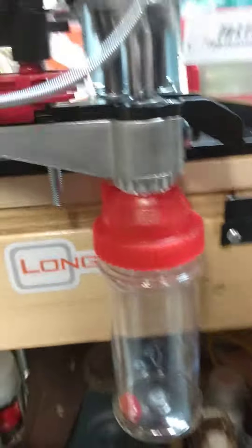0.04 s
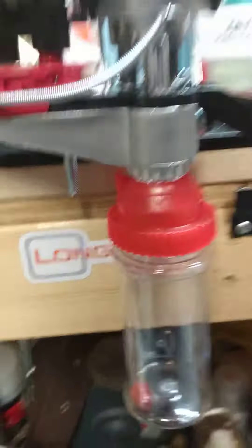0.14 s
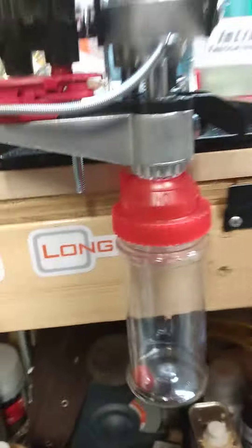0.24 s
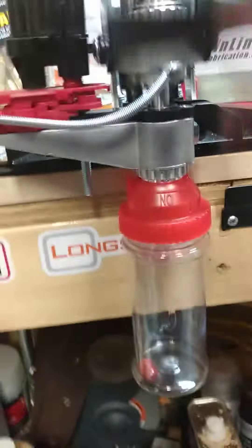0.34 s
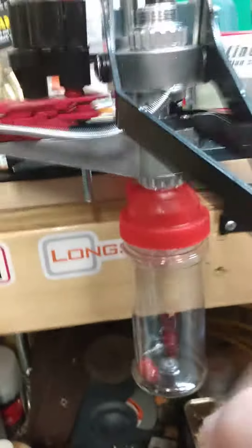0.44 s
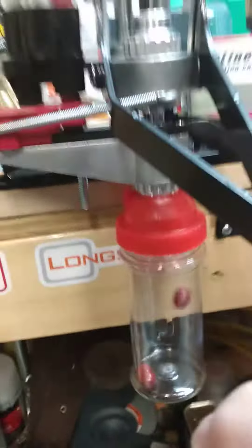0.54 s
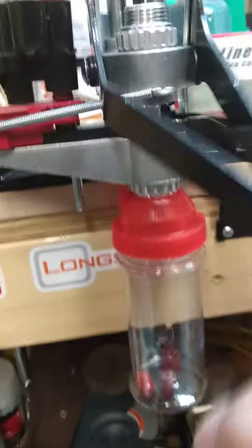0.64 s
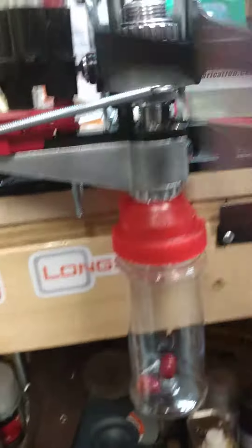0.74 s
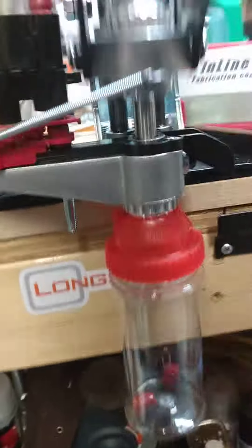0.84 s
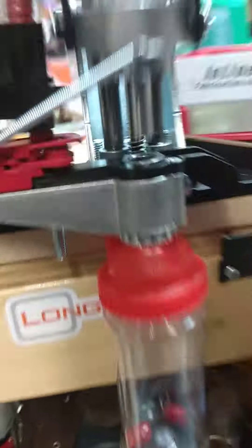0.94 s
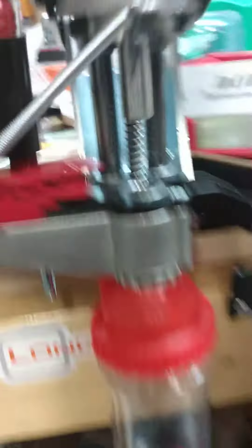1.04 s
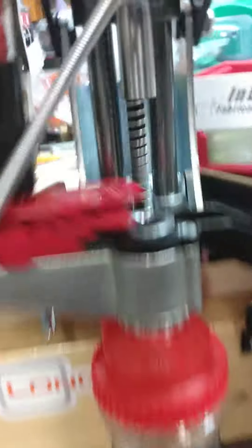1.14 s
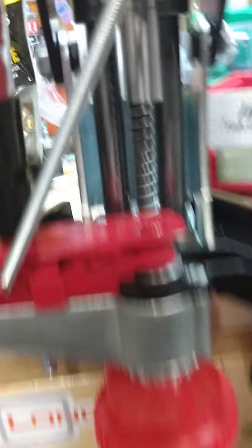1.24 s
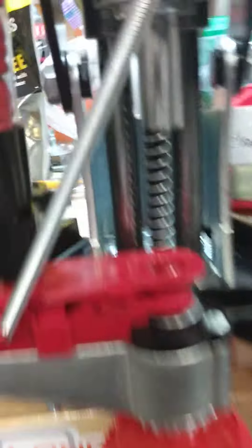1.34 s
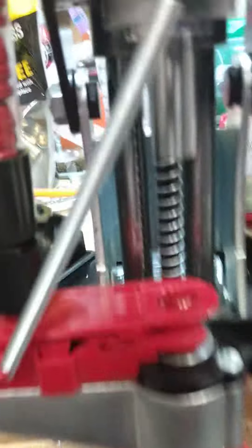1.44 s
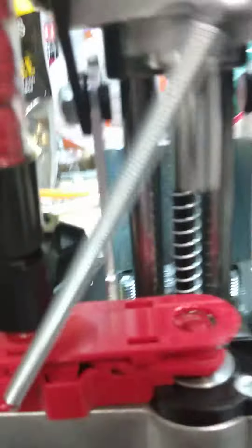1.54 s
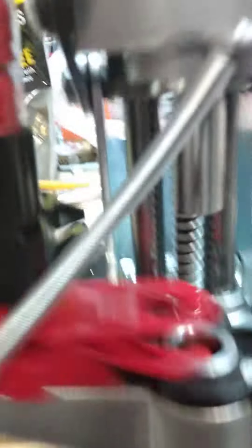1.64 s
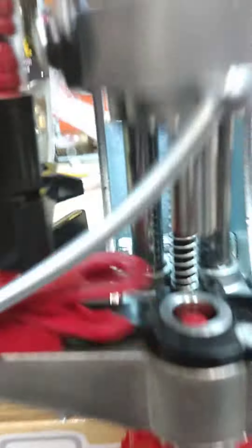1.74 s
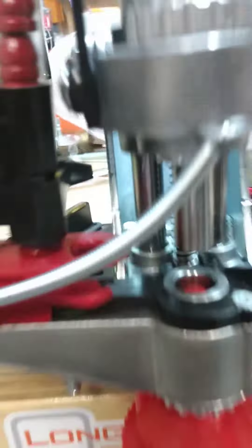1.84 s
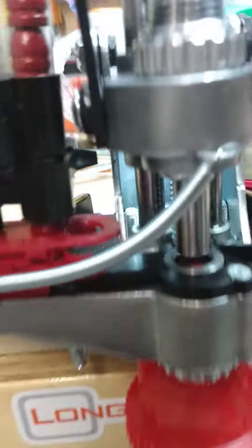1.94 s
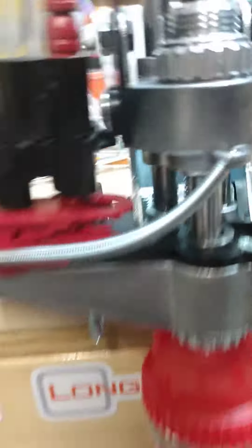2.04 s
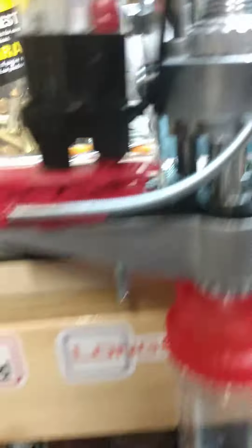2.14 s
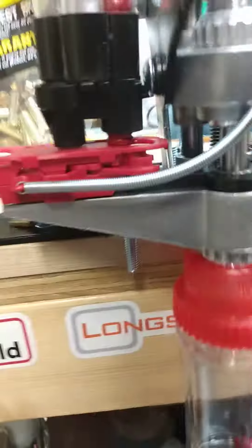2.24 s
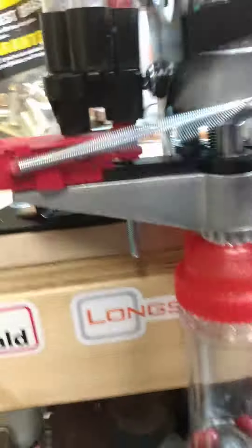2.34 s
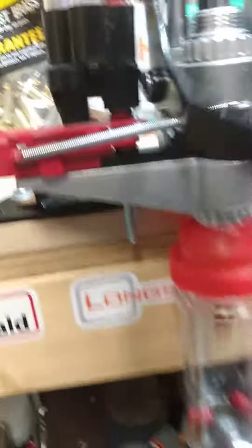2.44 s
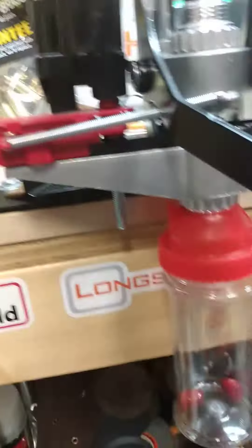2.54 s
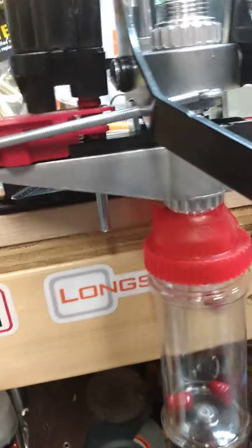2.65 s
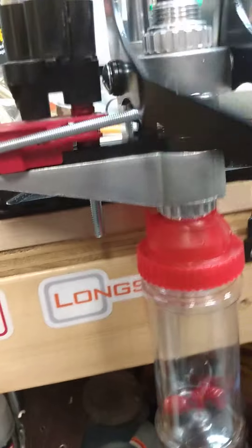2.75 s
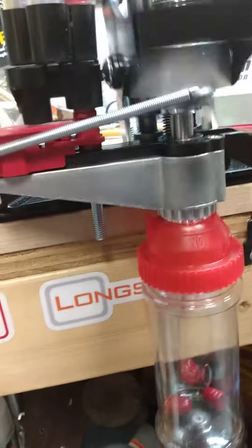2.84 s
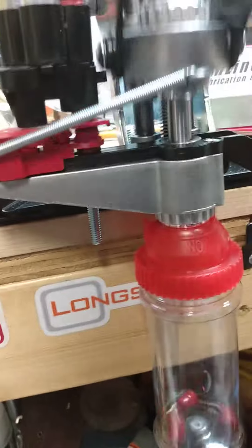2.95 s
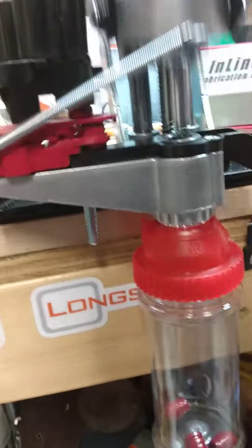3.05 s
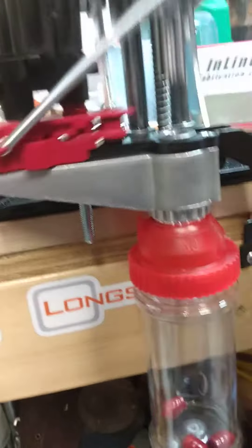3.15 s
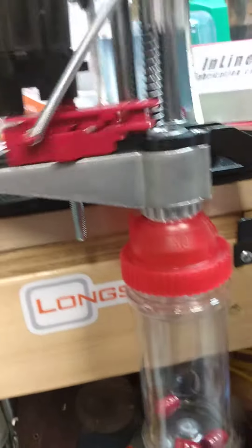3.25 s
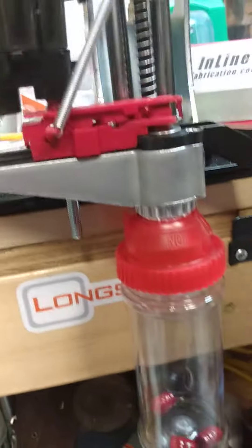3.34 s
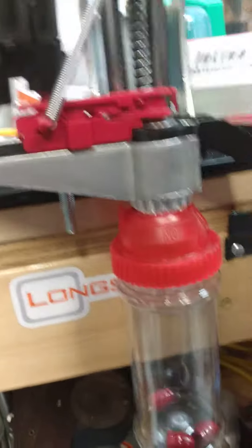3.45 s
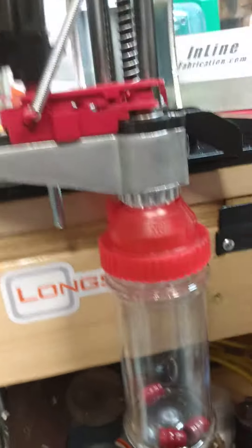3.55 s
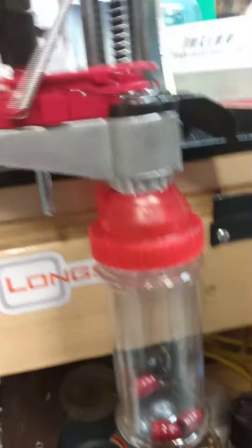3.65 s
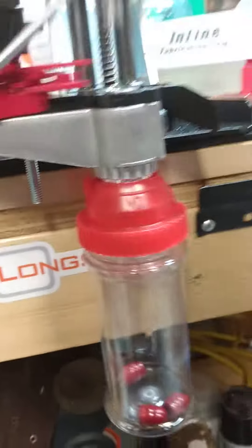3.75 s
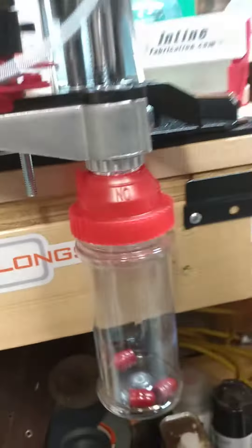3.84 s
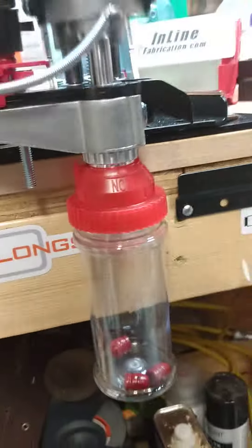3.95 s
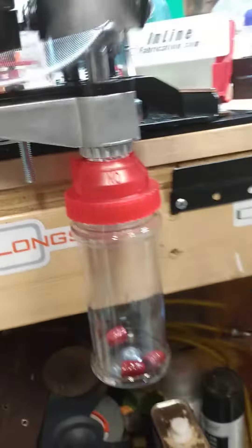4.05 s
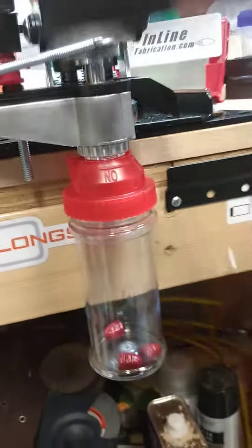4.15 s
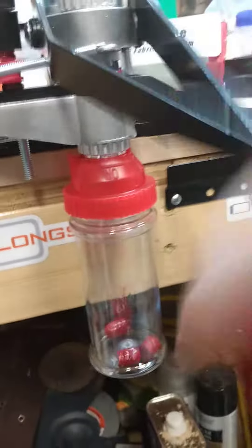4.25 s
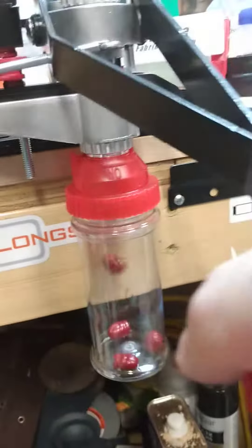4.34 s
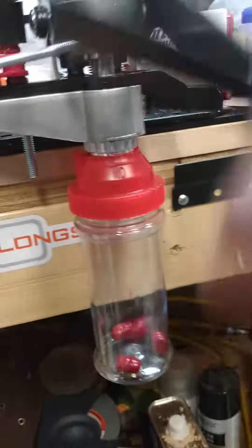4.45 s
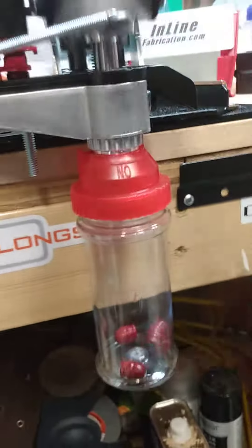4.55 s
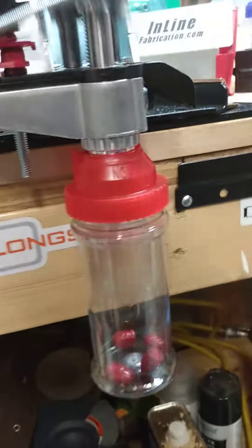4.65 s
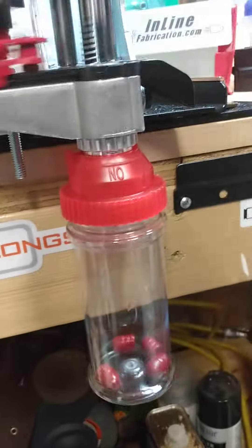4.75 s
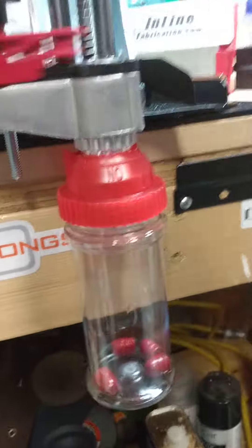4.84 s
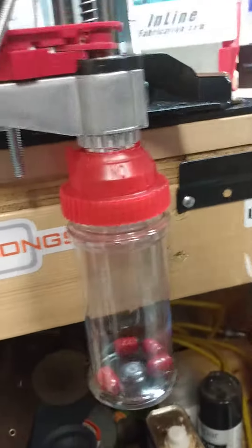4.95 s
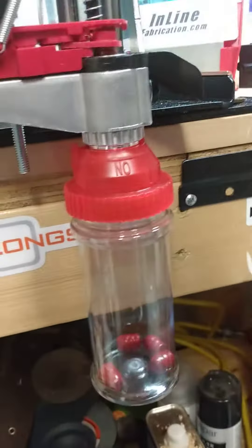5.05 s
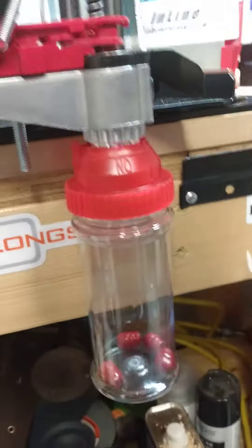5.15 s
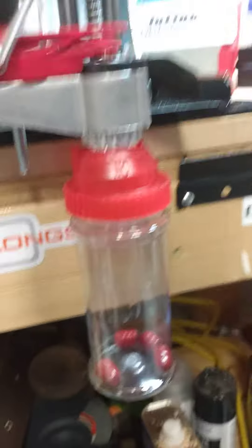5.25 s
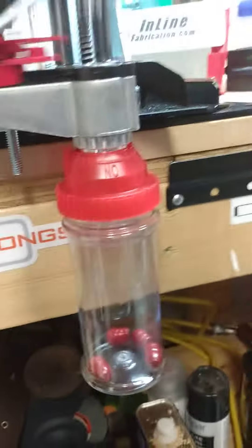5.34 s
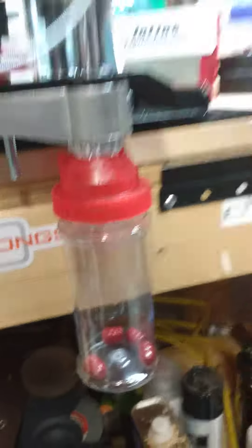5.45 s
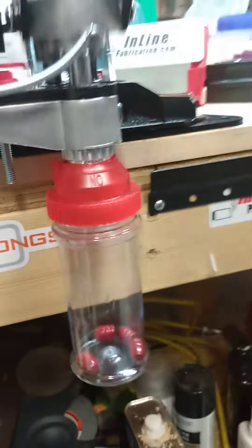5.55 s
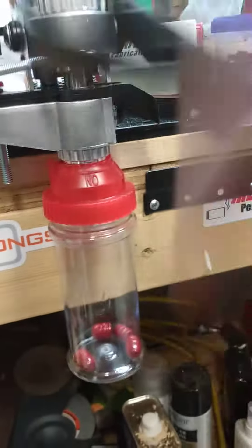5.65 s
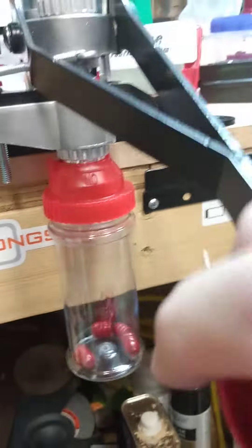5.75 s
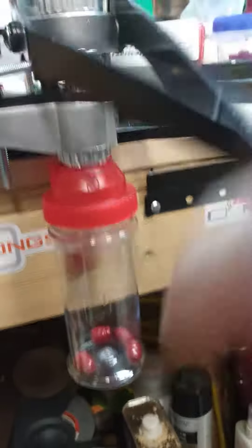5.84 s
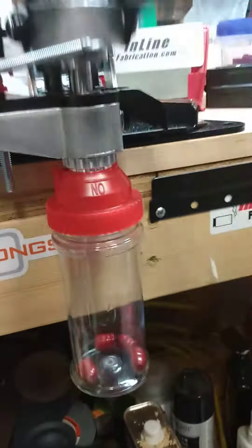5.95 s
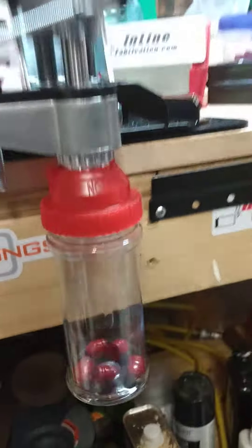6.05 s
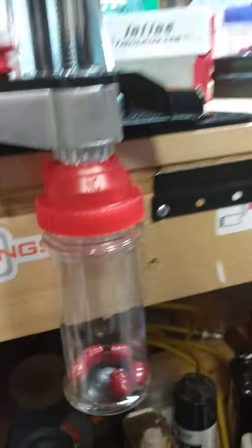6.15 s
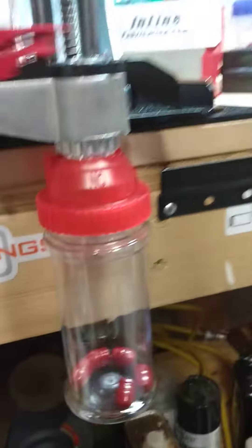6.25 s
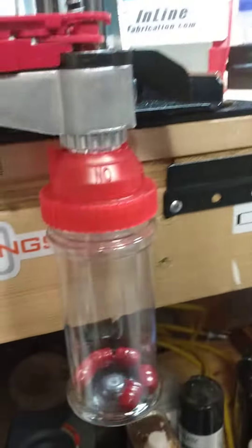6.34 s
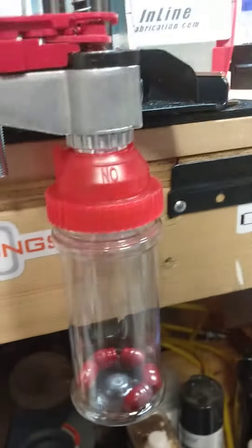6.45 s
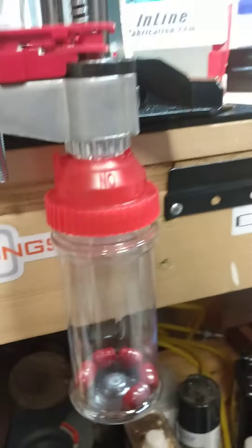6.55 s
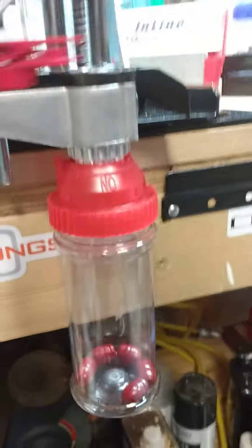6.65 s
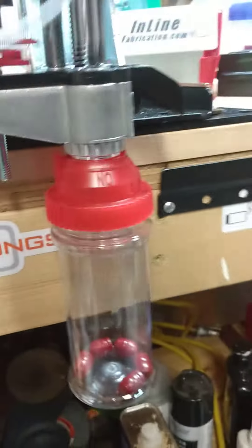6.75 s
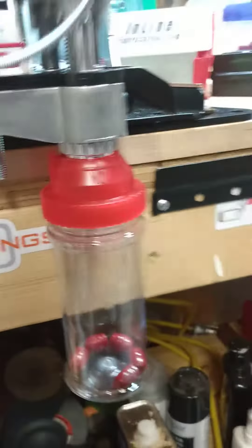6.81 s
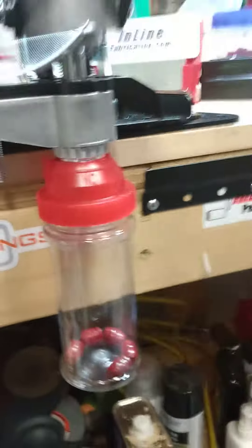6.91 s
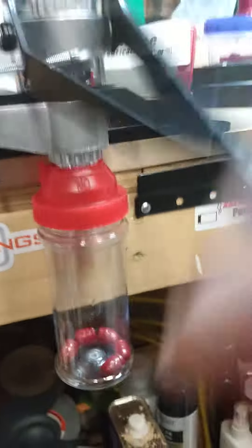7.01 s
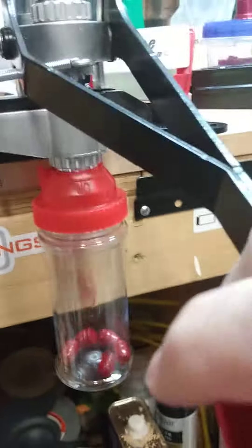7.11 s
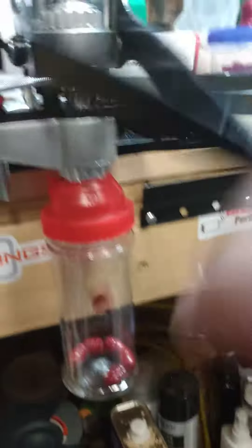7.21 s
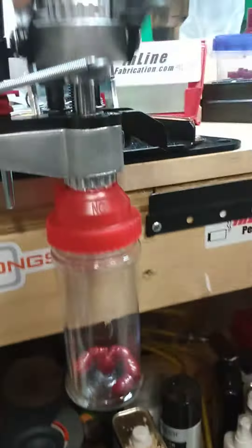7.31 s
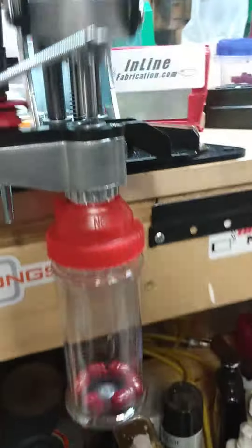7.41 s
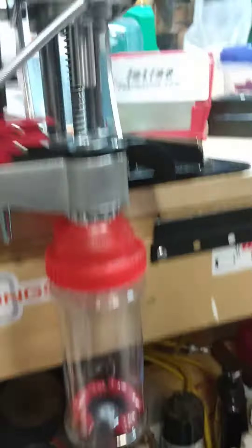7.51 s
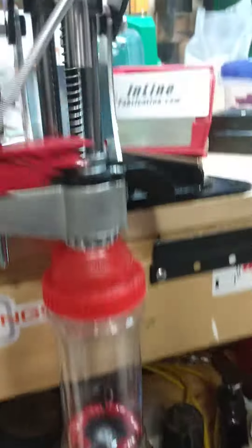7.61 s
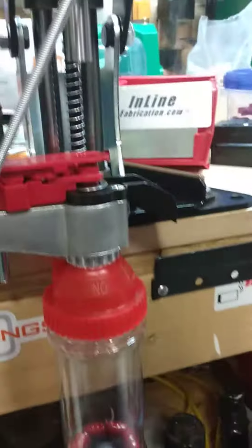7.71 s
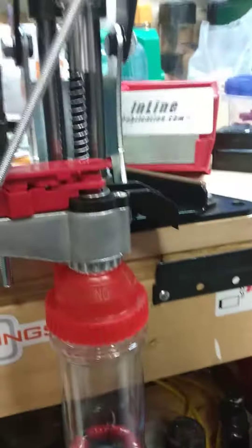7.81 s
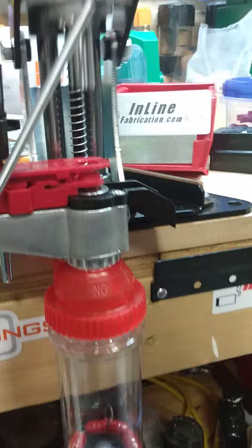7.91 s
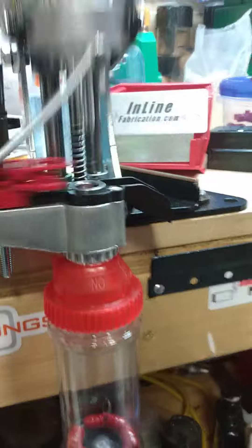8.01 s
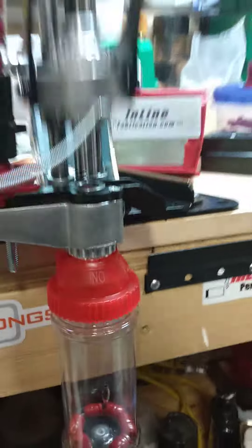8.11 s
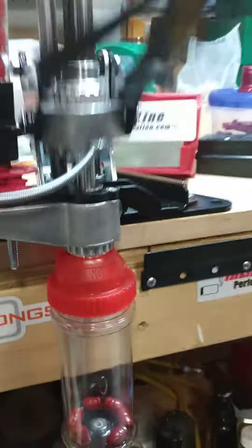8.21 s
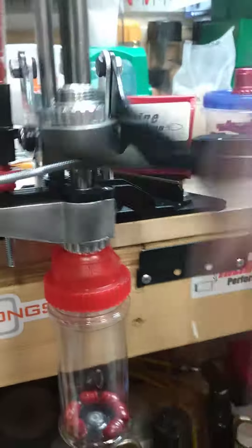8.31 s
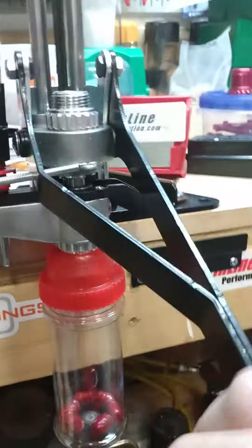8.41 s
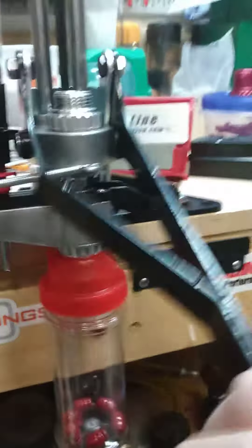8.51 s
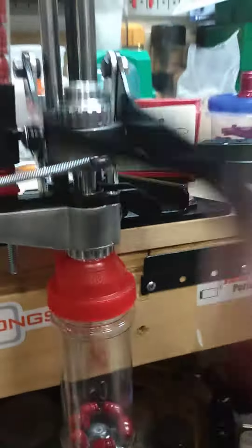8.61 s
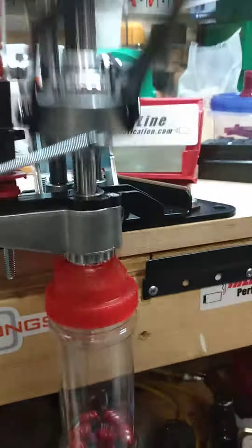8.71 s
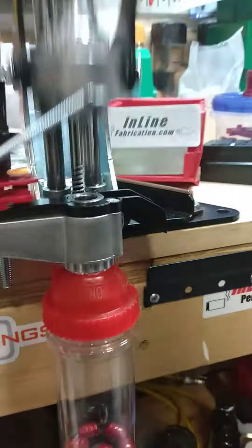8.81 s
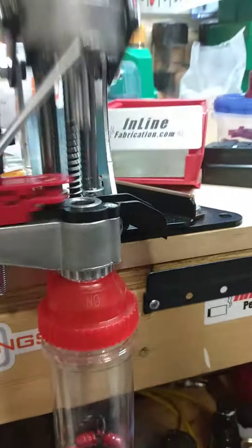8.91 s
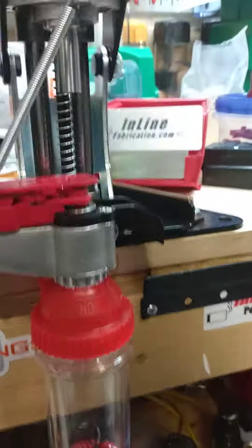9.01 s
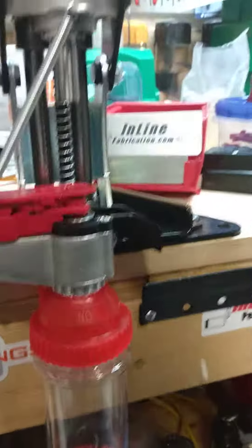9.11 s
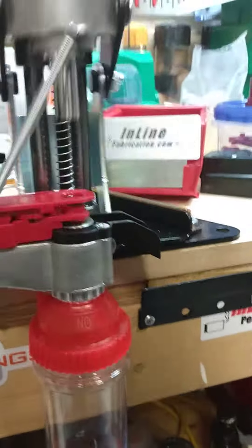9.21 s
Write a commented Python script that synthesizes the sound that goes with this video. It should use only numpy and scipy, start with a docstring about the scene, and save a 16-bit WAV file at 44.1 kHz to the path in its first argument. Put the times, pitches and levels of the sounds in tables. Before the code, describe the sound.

A hand press on a wooden bench, heard very close in a small, fairly dry workshop with faint room noise and low hum. After a few tiny clicks, the first stroke lands at about 0.6 s: a hard steel knock, a slug's snap and hollow jar thump, then return knocks until 1.0 s with spring rattle and a faint high metallic singing. The plastic feeder thuds softly at 1.4 s, and scrapes and snaps back at 1.7 s. Further strokes come around 2.5, 4.3, 5.8, 7.1 and 8.5 s, each with building rattle, a brief hiss, pop and clank, most led by quick ticks. Clattering return knocks follow each within about half a second. Dull slider clacks fall near 3.5, 5.1, 6.5, 7.8 and 9.2 s, the last two firmer. The spring sings again near 8.9 s. Treble is limited, and the loudest knocks are slightly rounded.

```python
"""A hand press on a wooden bench is cycled six times, close by, in a small workshop.
Steel knocks are noise cracks over damped modes of frame and bench; its linkage ticks in short bursts.
Slugs snap through the die and thump in a plastic jar; a plastic feed slider thuds against its stop.
Coil springs and feed tube rattle on as random contacts ringing resonances, loose slugs tap the frame,
rubbed metal hisses or sings as narrow-band noise, and faint room noise with a low hum lies beneath."""
import sys
import numpy as np
from scipy import signal
from scipy.fft import rfft, irfft
from scipy.io import wavfile
from scipy.ndimage import map_coordinates

SR = 44100
rng = np.random.default_rng(int(sys.argv[2]) if len(sys.argv) > 2 else 0)


def unload_wav(signal):
    """Save mono or channel-first audio to the path in sys.argv[1] as 16-bit WAV at rate SR, clipped to [-1, 1]."""
    wavfile.write(
        sys.argv[1],
        SR,
        np.round(np.clip(np.atleast_2d(signal).T, -1, 1) * 32767).astype(np.int16),
    )


N = 408807  # length in samples
AGE = np.arange(SR // 2) / SR  # time since a blow (s)


def amp(db):
    """Level definition: decibels become an amplitude ratio."""
    return 10 ** (np.asarray(db) / 20)


def unit(x):
    """Root-mean-square normalisation: the whole signal gets rms 1."""
    return x / np.sqrt(np.mean(x ** 2) + 1e-20)


def head(x, size=441):
    """Onset normalisation: the first `size` samples of a blow get rms 1."""
    return x / np.sqrt(np.mean(x[:size] ** 2) + 1e-20)


def along(points, hz):
    """Logarithmic frequency interpolation between (Hz, value) points."""
    point_hz, values = np.transpose(points)
    return np.interp(np.log(hz + 1), np.log(point_hz + 1), values)


def add(track, s, sound):
    """Superposition: a sound is summed into the track from time s."""
    part = track[max(round(s * SR), 0):][:len(sound)]
    part += sound[:len(part)]


def through(x, response):
    """Linear filtering: convolution with an impulse response, keeping the length."""
    return signal.fftconvolve(x, response)[:len(x)]


def colour(points, size=2048):
    """Minimum phase: folding the cepstrum makes a spectrum a causal response of energy 1."""
    log_spectrum = np.log(amp(along(points, np.fft.rfftfreq(size, 1 / SR))))
    cepstrum = np.fft.irfft(log_spectrum)
    cepstrum[1:size // 2] *= 2
    cepstrum[size // 2 + 1:] = 0
    response = irfft(np.exp(rfft(cepstrum)))
    return response / np.linalg.norm(response)


def fade(t60):
    """Exponential decay: the level falls 60 dB in t60 seconds."""
    return np.exp(-np.log(1000) * AGE / np.maximum(t60, 1e-3))


def ring(modes, detune, soft_db=0):
    """Modal superposition: damped sines whose level, pitch and sign vary from blow to blow."""
    hz, db, t60 = np.transpose(modes)[:, :, None]
    size, shift, side = rng.standard_normal((3, len(modes), 1))
    softening_db = soft_db * np.maximum(np.log2(hz / 1500), 0)  # soft_db per octave above 1500 Hz
    gain = amp(db + 3 * size - softening_db)
    phase = 2 * np.pi * hz * (1 + detune * shift) * AGE
    return np.sum(np.sign(side) * gain * fade(t60) * np.sin(phase), axis=0)


def ping(hz, t60):
    """Single-mode resonance: one small part rings at its own pitch."""
    return head(np.sin(2 * np.pi * hz * AGE) * fade(t60))


def crack(body, t60):
    """Impact noise: a decaying burst of micro-contacts is filtered by a body's response."""
    burst = rng.standard_normal(len(AGE)) * fade(t60)
    return head(through(burst, body))


# decay time of the workshop's reverberation: (frequency [Hz], t60 [s])
WORKSHOP_DECAY = [(100, .35), (500, 0.28), (2000, 0.12), (8000, 0.12)]


def room(x, wet_db, build_s=0.0018):
    """Diffuse reverberation: a noise tail builds up quickly and dies faster in the treble."""
    hz, t, z = signal.stft(rng.standard_normal(len(AGE)), SR, nperseg=256)
    decay = np.exp(-np.log(1000) * t / along(WORKSHOP_DECAY, hz)[:, None])
    tail = signal.istft(z * decay, SR, nperseg=256)[1][:len(AGE)]
    tail *= 1 - np.exp(-(AGE / build_s) ** 2)
    return x + amp(wet_db) * through(x, tail / np.linalg.norm(tail))


# hard knocks of ram and lever: (time [s], level [dB], treble re level [dB])
KNOCKS = [(0.5846, -11, -17.5), (0.7924, -11, -26), (0.8927, -17.5, -26), (0.9439, -21, -24.5),
          (1.0098, -25.5, -22), (2.6231, -11.5, -18), (2.8808, -13.5, -27.5), (2.956, -26, -22),
          (3.0259, -23.5, -18), (3.0561, -18.5, -31), (3.1163, -25, -21), (3.1571, -20, -20.5),
          (4.365, -10, -14), (4.567, -14.5, -21.5), (4.6416, -21.5, -44), (4.65, -19, -19.5),
          (4.7276, -22, -15.5), (4.7712, -25, -18.5), (5.8655, -13, -19), (6.0927, -27, -14),
          (6.1391, -32, -30), (6.1731, -18, -27), (6.2043, -27, -15), (7.2028, -11, -17.5),
          (7.4245, -17, -21.5), (7.4703, -23, -26), (7.5113, -22, -23), (7.569, -33, -15),
          (8.559, -13, -13), (8.842, -24, -14)]
# modes of the press frame, varied at each blow: (frequency [Hz], relative level [dB], t60 [s])
FRAME_MODES = [(793, -7.5, 0.071), (919.5, -5.5, 0.087), (993, -9, .07), (1093, -3.5, 0.035),
               (1481, -4, 0.035), (1535, 2, 0.015), (1621, -1.5, 0.056), (1813, 2, 0.028),
               (2400, -15.5, 0.15), (2870, -6, 0.044), (3096, -11, 0.06), (3513, -6.5, 0.019)]
# modes of the wooden bench, varied at each blow: (frequency [Hz], relative level [dB], t60 [s])
BENCH_MODES = [(68, -8.5, 0.28), (99.3, -17, 0.57), (106.4, 1, 0.3), (206, -1.5, 0.1), (247, 3.5, 0.089),
               (317, -14.5, 0.22)]
# spectrum of a knock's crack: (frequency [Hz], relative level [dB])
KNOCK_SPECTRUM = [(40, -19), (100, -13), (330, -6.5), (600, -10), (930, 8.5), (1250, -14), (1700, 6),
                  (2150, -4.5), (3200, -19), (3700, -11), (4400, -45)]
# spectrum of the treble shared by all contacts: (frequency [Hz], relative level [dB])
TREBLE_SPECTRUM = [(3000, -47.5), (4000, 21), (5000, 22.5), (5600, 17), (7000, 19.5), (7700, 12.5),
                   (8300, -49)]


def knocks():
    """Impact excitation: steel meets steel, the frame rings briefly and the bench thuds under it."""
    out, body, treble = np.zeros(N), colour(KNOCK_SPECTRUM), colour(TREBLE_SPECTRUM)
    for s, db, treble_db in KNOCKS:
        # duller blows excite the upper modes less
        frame = head(ring(FRAME_MODES, detune=0.0096, soft_db=-.7 * (treble_db + 24.0)))
        clank = head(frame + amp(-4.0) * crack(body, t60=0.035))
        thud = amp(-32.5) * head(ring(BENCH_MODES, detune=0.0074))
        blow = clank + thud + amp(treble_db) * crack(treble, t60=0.029)
        add(out, s, amp(db) * room(blow, wet_db=-9.0))
    return out


# single light contacts of linkage and feeder: (time [s], level [dB], treble re level [dB])
CLICKS = [(0.2245, -38.5, -11), (0.2874, -37.5, -17.5), (0.3794, -44, -12), (0.4234, -44, -9),
          (0.5664, -30.5, -6), (0.7816, -29.5, -17.5), (1.7137, -40, -28), (2.1533, -39, -15.5),
          (2.3413, -41, -18), (2.4129, -39, -17), (2.484, -36.5, -9.5), (2.6035, -24, -9),
          (2.835, -35, -20), (3.3098, -35, -18.5), (3.7796, -44.5, -21.5), (5.2908, -46, -25),
          (5.348, -57, -27), (6.078, -31, -13), (8.7953, -28, -12.5)]
# even runs of linkage ticks on a brisk pull: (start [s], gap [s], level [dB])
RUNS = [(4.0628, .0485, -37.5), (5.6107, 0.034, -37), (6.94, .035, -37), (8.3033, .033, -36.5)]
RUN_S, RUN_TREBLE_DB = .15, -9.5  # length of a run; its treble re its level
# the slider ticks this long before its stop, this much softer; the tick's treble re its level
TOUCH_S, TOUCH_DB, TOUCH_TREBLE_DB = .035, -17, -10
# spectrum of a light contact: (frequency [Hz], relative level [dB])
CLICK_SPECTRUM = [(50, -35.5), (150, -11.5), (370, -7), (750, -19), (1200, -7.5), (1550, -8), (1820, -4),
                  (2300, -14), (3100, -12), (3700, -15), (4400, -36.5)]


def clicks():
    """Taking up play: pins and feeder meet in small dry clicks, each with a pitch of its own."""
    out, body, treble = np.zeros(N), colour(CLICK_SPECTRUM), colour(TREBLE_SPECTRUM)
    runs = [(s + later, db, RUN_TREBLE_DB)
            for s, gap_s, db in RUNS
            for later in np.arange(0, RUN_S, gap_s)]
    touches = [(s - TOUCH_S, db + TOUCH_DB, TOUCH_TREBLE_DB) for s, db, _, _ in SLIDER_STOPS]
    for s, db, treble_db in CLICKS + touches + runs:
        pitch_hz = 1500 * np.exp(.18 * rng.normal())
        tick = head(crack(body, t60=.018) + amp(-3) * ping(pitch_hz, t60=.025))
        tick = tick + amp(treble_db) * crack(treble, t60=0.012)
        add(out, s, amp(db) * room(tick, wet_db=-1.5))
    return out


# the feed slider scraping back and letting go of its slug: (time [s], level of the snap [dB])
RELEASES = [(1.743, -33.5), (3.8082, -37.5), (5.4007, -35), (6.7441, -34), (8.0857, -36)]


def releases(lead_s=0.085):
    """Stick-slip friction: jaws scrape along the slug in growing jerks, then snap shut."""
    out, body, treble = np.zeros(N), colour(CLICK_SPECTRUM), colour(TREBLE_SPECTRUM)
    for s, db in RELEASES:
        for before in lead_s * rng.random(size=12) ** 2:  # jerks crowd towards the snap
            slip = crack(body, t60=0.035) + amp(-9.0) * crack(treble, t60=0.038)
            add(out, s - before, amp(-51 - 12 * before / lead_s) * slip)
        pitch_hz = 1700 * np.exp(.08 * rng.normal())
        snap = head(crack(body, t60=.028) + amp(-5) * ping(pitch_hz, t60=.025))
        snap = snap + amp(-21.0) * crack(treble, t60=0.13)
        add(out, s, amp(db) * room(snap, wet_db=-4.5))
    return out


# slugs popping through the die into the jar:
# (time [s], snap level [dB], treble re snap [dB], jar thump level [dB], bench thud level [dB])
DROPS = [(0.6578, -19.5, -8.5, -27, -35), (2.5229, -18, -6.5, -34, -38.5), (4.2655, -19, -6, -33.5, -41),
         (5.7922, -23.5, -1.5, -33.5, -38.5), (5.8184, -17, -11.5, -44, -35), (7.1213, -22, -4.5, -35, -38),
         (7.1557, -18.5, -8, -34, -34), (8.452, -22, -3.5, -38, -41.5), (8.507, -16.5, -7, -27.5, -34.5)]
# modes of the plastic jar, varied at each drop: (frequency [Hz], relative level [dB], t60 [s])
JAR_MODES = [(212, -8, 0.034), (325, 2, 0.16), (456, -7.5, 0.18), (560, -5.5, 0.037), (740, -4, 0.064)]


def drops():
    """Sudden release, then resonance: a slug snaps free, and hollow jar and bench swell into a thump."""
    out, body, treble = np.zeros(N), colour(RATTLE_SPECTRUM), colour(TREBLE_SPECTRUM)
    for s, db, treble_db, thump_db, thud_db in DROPS:
        snap = head(crack(body, t60=0.028) * (1 - np.exp(-AGE / 0.00071)))
        snap = snap + amp(treble_db) * crack(treble, t60=0.012)
        thump = head(ring(JAR_MODES, detune=.035) * (1 - np.exp(-AGE / 0.039)), size=1544)
        thud = head(ring(BENCH_MODES, detune=0.037) * (1 - np.exp(-AGE / 0.029)), size=1544)
        wet_snap = room(amp(db) * snap, wet_db=-5.0)
        wet_thump = amp(thump_db) * room(thump, wet_db=-10)
        add(out, s, wet_snap + wet_thump + amp(thud_db) * thud)
    return out


# the feed slider reaching its stop:
# (time [s], level of the main clack [dB], treble re level [dB], bench thud level [dB])
SLIDER_STOPS = [(1.4045, -36.5, -16, -40.5), (3.4909, -38.5, -14, -39.5), (5.1415, -46, -26, -46.5),
                (6.5062, -36, -23, -41), (7.812, -30, -16, -33.5), (9.1629, -29.5, -25, -33)]


def slider():
    """Damped impact: the plastic slider stops with a dull clack that shakes the bench."""
    out, body, treble = np.zeros(N), colour(CLICK_SPECTRUM), colour(TREBLE_SPECTRUM)
    for s, db, treble_db, thud_db in SLIDER_STOPS:
        clack = crack(body, t60=0.034) + amp(treble_db) * crack(treble, t60=0.087)
        thud = head(ring(BENCH_MODES, detune=0.02) * (1 - np.exp(-AGE / 0.0013)), size=2205)
        clack = clack + amp(-6.5) * crack(body, t60=0.0071)  # the first hard touch
        add(out, s, room(amp(db) * clack + amp(thud_db) * thud, wet_db=-12.5))
    return out


# shaking of springs and feed tube by the pull, the return and the slider's stop in each cycle:
# (start [s], build-up [s], hold [s], peak level [dB], treble re level [dB])
SHAKES = [(0.565, 0.078, 0.049, -37, -6), (0.789, 0.29, 0.082, -34, -22), (1.403, 0.011, 0.063, -43, -15),
          (2.464, .13, .11, -33.5, -15.5), (2.886, 0.21, .17, -30, -20), (3.496, 0.032, 0.077, -36, -16),
          (4.106, 0.29, 0.15, -31.5, -17.5), (4.664, .12, 0.16, -31.5, -16),
          (5.142, 0.016, 0.034, -47, -22), (5.635, 0.26, 0.15, -32, -16.5),
          (6.08, 0.022, 0.24, -25.5, -13.5), (6.513, 0.027, 0.045, -37, -17),
          (6.97, 0.28, 0.15, -29, -14.5), (7.429, 0.093, 0.13, -29, -15.5),
          (7.809, .025, 0.097, -30.5, -14), (8.334, 0.22, 0.11, -29, -12.5),
          (8.823, 0.019, 0.12, -30, -14.5), (9.166, .02, .1, -32, -14.5)]
BUILD_DB_PER_S, SAG_DB_PER_S, STOP_DB_PER_S = 72, 51.5, 302.5  # a shake grows, sags in its hold, stops
JOLT_DB, JOLT_DB_PER_S, JOLT_TREBLE_DB = -14.5, 199, -14  # every knock jolts the springs too
# faint quiver re a shake of the length QUIVER_SHAKE_S, and its decay; shorter shakes leave less
QUIVER_DB, QUIVER_DB_PER_S, QUIVER_SHAKE_S = -28.5, 70.5, 0.99


def shaking():
    """Power summation: shakes and jolts add up to two gains per sample, for body and for treble."""
    t, power = np.arange(N) / SR, np.zeros((2, N))
    for s, build_s, hold_s, db, treble_db in SHAKES:
        since_peak = t[:SR] - build_s
        since_stop = np.maximum(since_peak - hold_s, 0)
        growth_db = BUILD_DB_PER_S * since_peak
        sag_db = -SAG_DB_PER_S * np.minimum(since_peak, hold_s)
        swell_db = np.minimum(growth_db, sag_db)
        quiver = amp(QUIVER_DB - QUIVER_DB_PER_S * since_stop) * (build_s + hold_s) / QUIVER_SHAKE_S
        shake = amp(db + swell_db) * (amp(-STOP_DB_PER_S * since_stop) + quiver)
        add(power[0], s, shake ** 2)
        add(power[1], s, (amp(treble_db) * shake) ** 2)
    for s, db, _ in KNOCKS:
        jolt = amp(db + JOLT_DB - JOLT_DB_PER_S * AGE)
        add(power[0], s, jolt ** 2)
        add(power[1], s, (amp(JOLT_TREBLE_DB) * jolt) ** 2)
    return np.sqrt(power)


# resonances of springs and tube: (frequency [Hz], bandwidth [Hz], relative peak response [dB])
SPRING_MODES = [(170.6, 6.4, 3), (216, 19, 4), (331, 27, 7), (967, 22, 10), (1058, 15, 3), (1725, 68, 4.5),
                (2235, 4.2, -1), (3080, 50, -15)]
# broad spectrum of the rattle, also of a slug's snap: (frequency [Hz], relative level [dB])
RATTLE_SPECTRUM = [(40, -36.5), (120, -26), (170, -5.5), (400, -1.5), (600, -6), (950, -8.5), (1250, 0.5),
                   (1700, -5.5), (2100, -11), (3400, -5.5), (4400, -56.5)]


def rattle(shake, grit, rate=420, spread_db=2.0):
    """Random-impact excitation: chattering coils and stacked slugs, `rate` uneven contacts a second."""
    sizes = amp(spread_db * np.minimum(rng.exponential(size=N), 3))
    contacts = (rng.random(N) < rate / SR) * sizes
    force = np.sqrt(np.abs(through(contacts ** 2, fade(t60=0.011))))
    chatter = force * rng.standard_normal((2, N))
    # an amplitude proportional to bandwidth makes the peak response independent of it
    modes = sum(amp(gain) * width * np.exp(-np.pi * width * AGE) * np.cos(2 * np.pi * hz * AGE)
                for hz, width, gain in SPRING_MODES)
    broad = unit(through(chatter[0], colour(RATTLE_SPECTRUM)))
    resonant = unit(through(chatter[1], modes))
    fizz = unit(through(chatter[1], colour(TREBLE_SPECTRUM)))
    return room(shake * unit(broad + resonant) + grit * fizz, wet_db=-8.5)


def slug_taps(shake, rate=8, count=9, tap_db=0.5, spread_db=2.0):
    """Driven impacts: loose slugs tap the frame at a few spots, louder as the shaking is harder."""
    out = np.zeros(N)
    for _ in range(count):
        hits = rng.random(N) < rate / SR  # `rate` taps a second at each spot
        taps = hits * shake * amp(tap_db + spread_db * (2 * rng.random(N) - 1))
        out += through(taps, head(ring(FRAME_MODES, detune=0.046) * fade(t60=0.048)))
    return out


def swell(s, half_s, hz, width_hz):
    """Friction-driven resonance: noise feeds one mode under a bell-shaped envelope around time s."""
    resonance = np.exp(-np.pi * width_hz * AGE) * np.sin(2 * np.pi * hz * AGE)
    middle = AGE[-1] / 2
    envelope = np.exp(-((AGE - middle) / half_s) ** 2 / 2)
    return unit(through(rng.standard_normal(len(AGE)), resonance)) * envelope, s - middle


# sliding strokes, hissy on the ram and dull on the slider:
# (middle [s], envelope deviation [s], centre frequency [Hz], level at the middle [dB])
SCRAPES = [(1.314, 0.034, 1336, -63), (2.489, 0.013, 5450, -35.5), (4.229, 0.023, 5220, -45.5),
           (5.756, 0.016, 4700, -38.5), (7.082, 0.011, 4900, -32.5), (8.422, 0.018, 5100, -38),
           (9.091, 0.11, 1460, -54)]
# the long spring singing as it swings back:
# (middle [s], envelope deviation [s], frequency [Hz], level at the middle [dB])
SINGS = [(1.101, 0.055, 2454, -42), (8.921, 0.043, 2450, -37)]


def friction():
    """Bandwidth of friction noise: sliding metal hisses broadly, the rubbed spring sings narrowly."""
    out = np.zeros(N)
    for s, half_s, hz, db in SCRAPES:
        sound, start = swell(s, half_s, hz, width_hz=.13 * hz)
        add(out, start, amp(db) * sound)
    for s, half_s, hz, db in SINGS:
        sound, start = swell(s, half_s, hz, width_hz=6.8)
        add(out, start, amp(db) * sound)
    return out


# spectrum of the room noise: (frequency [Hz], relative level [dB])
BACKGROUND_SPECTRUM = [(15, -56), (25, -17.5), (38, -15), (63, 2.5), (135, -13.5), (348, -24.5), (581, -28),
                       (1100, -25), (3280, -31), (8500, -41), (11000, -73.5), (18700, -120)]


def background():
    """Stationary noise and a pure tone: faint, slightly wavering room noise with a low hum."""
    # one random level every 2000 samples, joined smoothly
    waver = map_coordinates(rng.standard_normal(N // 2000 + 4), [np.arange(N) / 2000])
    air = unit(through(rng.standard_normal(N), colour(BACKGROUND_SPECTRUM, size=8192)))
    hum = amp(-72) * np.sqrt(2) * np.sin(2 * np.pi * 70 * np.arange(N) / SR)
    return amp(-64.5 + 2.4 * waver) * air + hum


def scene():
    """Superposition of sources: all parts of the press and the background sum to one channel."""
    blows = knocks() + clicks() + releases() + drops() + slider()
    shake, grit = shaking()
    return (blows + rattle(shake, grit) + slug_taps(shake) + friction() + background())[None]


def record(dry, top_hz=7850):
    """Band limiting and saturation: deep bass is shed, peaks are rounded, and top_hz is a steep limit."""
    lean = signal.sosfilt(signal.butter(4, 51, "highpass", fs=SR, output="sos"), dry)
    held = lean / (1 + np.abs(lean / .74) ** 6) ** (1 / 6)  # amplitude stays below 0.74
    return signal.sosfilt(signal.cheby1(12, .1, top_hz, fs=SR, output="sos"), held)


dry = scene()
out = record(dry)
unload_wav(out)
```